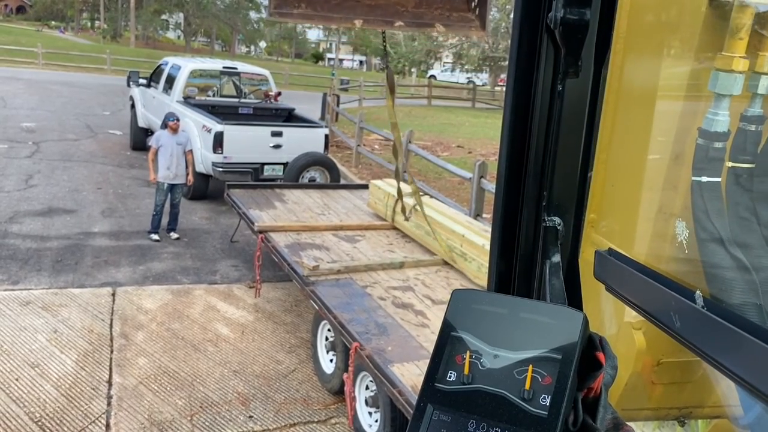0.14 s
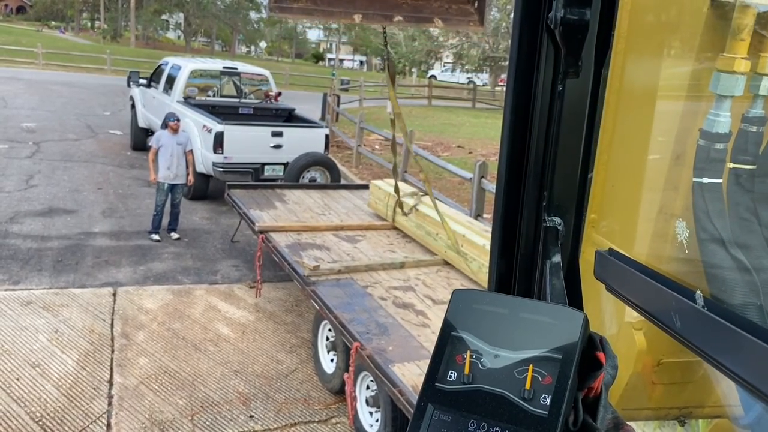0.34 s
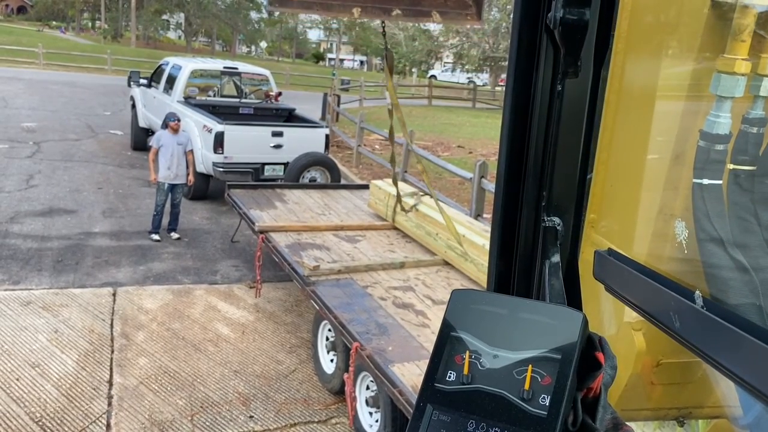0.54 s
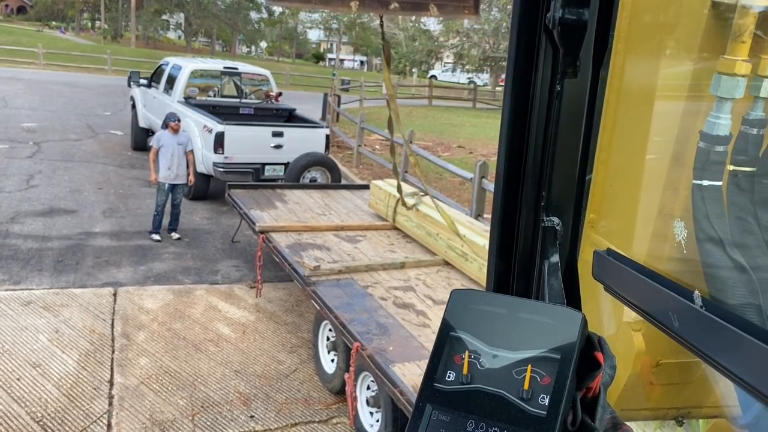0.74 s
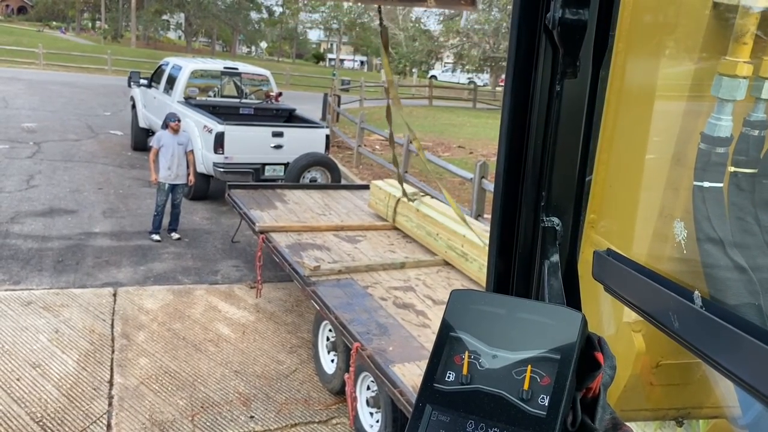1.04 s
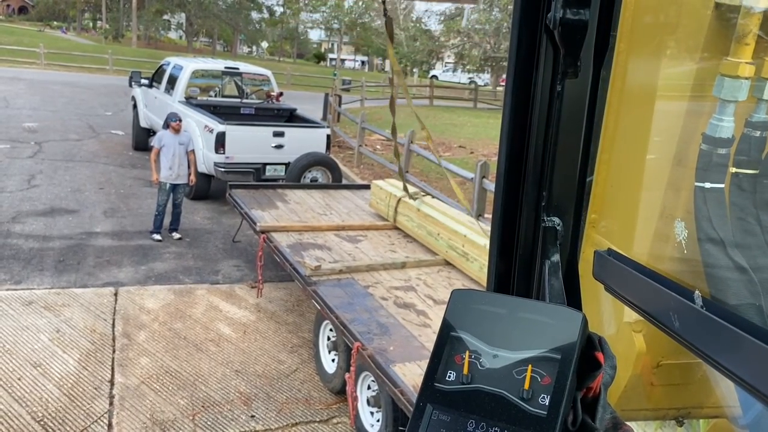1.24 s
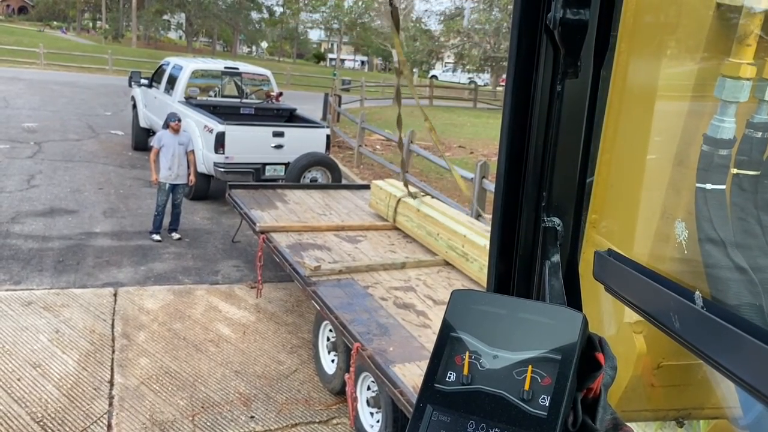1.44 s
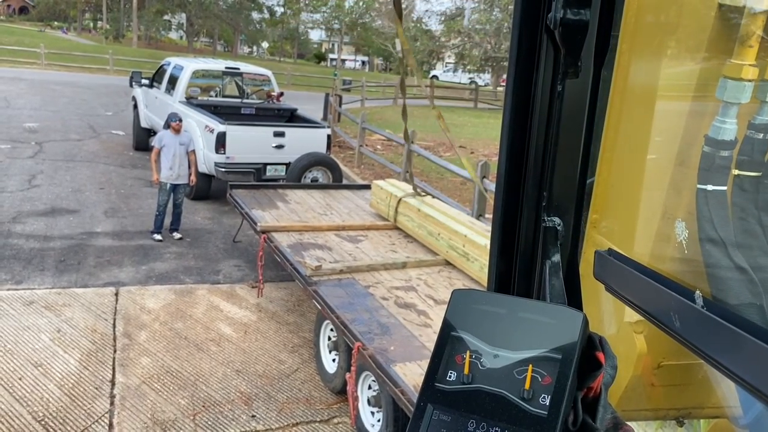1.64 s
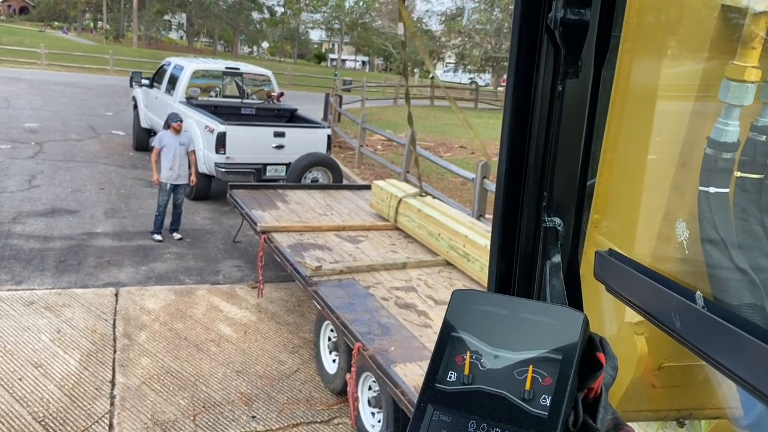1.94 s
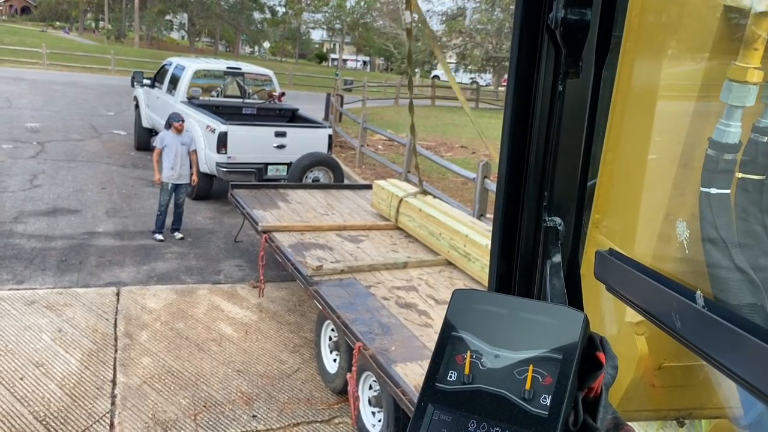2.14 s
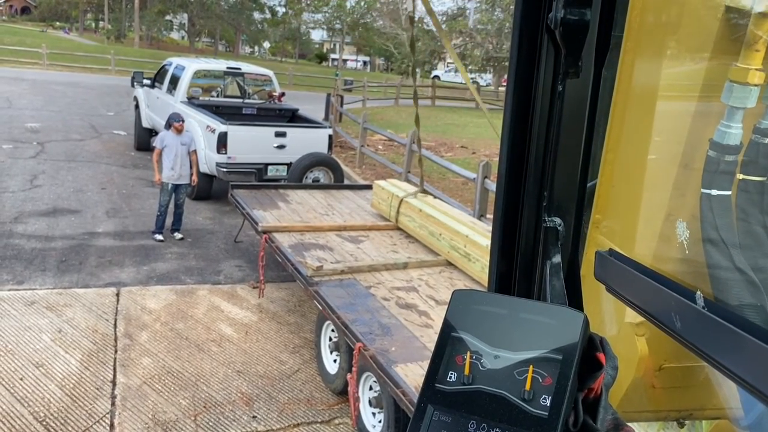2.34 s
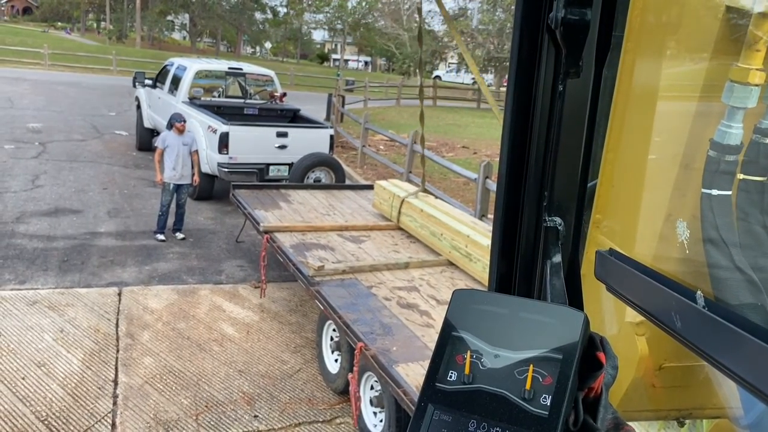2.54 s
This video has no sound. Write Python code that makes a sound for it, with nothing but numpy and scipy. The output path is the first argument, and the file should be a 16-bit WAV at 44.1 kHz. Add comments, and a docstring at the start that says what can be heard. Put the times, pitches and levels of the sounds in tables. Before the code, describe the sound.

A diesel excavator engine drones throughout at nearly constant revs, a deep, boomy tone filling the cab. Fan hum, a hydraulic pump whine that dips around 1.6 seconds and grows slightly after 2, dull rumble and soft hiss surround it. Faint, bright chain clinks come from outside near 0.7, 0.9, 1.4 and 1.8 seconds, clearest at 2.0, then several weak ones from 2.3 to 2.6.

```python
"""A deep four-cylinder boom fills the cab of a diesel excavator lifting a load at nearly steady revs.
Fan, piston pump and a geared accessory hum as harmonic series over rumble and hiss of filtered noise,
which cab panels and engine covers colour by resonance. Outside, the lifting chain clinks now and then:
crackling noise and ringing modes. A phone with two microphone ports hears it all."""
import sys
import numpy as np
from scipy import signal
from scipy.fft import rfft, irfft
from scipy.io import wavfile
from scipy.ndimage import uniform_filter1d

SR = 44100
rng = np.random.default_rng(int(sys.argv[2]) if len(sys.argv) > 2 else 0)


def store_pcm(level_fs):
    """Save levels as 16-bit WAV."""
    pcm = np.round(np.clip(level_fs, -1, 1) * 32767).astype(np.int16)
    wavfile.write(sys.argv[1], SR, np.atleast_2d(pcm).T)


N = 119070
T = np.arange(N) / SR  # s
HZ = np.maximum(np.fft.rfftfreq(N, 1 / SR), 1)


def undb(db):
    """Level law: an amplitude ratio is ten to the power of dB/20."""
    return 10 ** (np.asarray(db) / 20)


def read(table, count=1):
    """Spectral envelope: a column of a table, interpolated over log frequency."""
    table = np.array(table)
    return np.interp(np.log(HZ), np.log(table[:, 0]), table[:, count])


def walk(rate_hz):
    """Low-pass random modulation: a loop of 200 chance steps, smoothed twice, spread near 1."""
    step_samples = int(SR / rate_hz)
    held = rng.standard_normal(200)[np.arange(N) // step_samples % 200]
    return 1.27 * uniform_filter1d(uniform_filter1d(held, step_samples), step_samples)


def ringing(table):
    """Resonance: each mode lifts the gain around its own frequency."""
    return undb(sum(db * np.exp(-((HZ - hz) / width) ** 2 * 2) for hz, width, db in table))


LAG_S, LAG_FROM_HZ, IN_STEP_HZ = .00026, 6490, 10060  # the left port is late above LAG_FROM_HZ


def port_phase(hz):
    """Interaural-style delay: half the phase between ports (rad), constant below LAG_FROM_HZ."""
    return np.pi * LAG_S * (np.maximum(hz, LAG_FROM_HZ) - IN_STEP_HZ)


# Coherence of the noise at the two microphone ports
# (f/Hz, share of power common to both ports/0-1, left over right level/dB)
PORT_COHERENCE = [(60, 0.91, -0.2), (109, 0.93, -4), (196, 1, -4), (373, .5, 0), (700, 0.09, -1.5),
                  (1290, 0.12, -0.1), (2430, 0.05, .6), (4400, .3, 3), (7040, 0.62, 1.5), (15000, 1, -1.5)]


def at_ports(colour):
    """Partial coherence: spectra of common and unrelated noise at two ports, colour gain of rms 1."""
    common, left, right = rfft(rng.standard_normal((3, N)))
    share = np.clip(read(PORT_COHERENCE), 0, 1)
    shift = np.exp(-1j * port_phase(HZ))
    side = undb(read(PORT_COHERENCE, count=2) / 2)
    own = np.sqrt(1 - share)
    left_port = side * (np.sqrt(share) * common * shift + own * left)
    right_port = (np.sqrt(share) * common / shift + own * right) / side
    gain = undb(read(colour))
    return gain / np.sqrt(np.mean(gain ** 2)) * np.array([left_port, right_port])


WAVER_HZ = 5.66  # step rate of the level waver


def hum(turns, table):
    """Fourier series: wavering harmonics of a turning shaft, with level and phase offsets between ports."""
    out = 0
    ear = np.array([[.5], [-.5]])  # left, right
    for multiple, db, pan_db, lead, waver_db in table:
        phase = 2 * np.pi * (round(multiple) * turns + rng.random())
        level_db = db + waver_db * walk(WAVER_HZ) + pan_db * ear
        out = out + np.sqrt(2) * undb(level_db) * np.sin(phase + lead * ear)  # sqrt(2): levels are rms
    return out


# Engine speed, told by the second harmonic of the nine-piston pump, at 36 times the four-stroke cycle
# (t/s, f/Hz, gain on the pump hum/dB)
SHAFT_SPEED = [(.1, 471.6, 0.7), (.35, 470.6, 0), (.9, 471.6, -1), (1.2, 470.9, -1.5), (1.6, 470.2, -2.5),
               (1.8, 469.7, -1), (2.05, 470.3, 0.5), (2.25, 470.3, 1.5), (2.42, 472.6, 2), (2.6, 473.4, 2)]


def shaft():
    """Phase is the integral of frequency: engine cycles elapsed, and the pump gain along with them."""
    at, hz, pump_db = np.array(SHAFT_SPEED).T
    cycle = np.cumsum(np.interp(T, at, hz)) / 36 / SR
    return cycle, undb(np.interp(T, at, pump_db))


# Rumble and hiss as the cab colours them (f/Hz, relative level per Hz/dB)
CAB_COLOUR = [(20, -53), (45, -48), (62, -34), (72, -34.5), (81, -30.5), (87, -35), (97, -33), (107, -35.5),
              (114, -42.5), (125, -46.5), (150, -40), (168, -34.5), (190, -40.5), (210, -48), (230, -49.5),
              (300, -55.5), (340, -50.5), (450, -54.5), (550, -57), (690, -58.5), (750, -61.5),
              (1000, -63.5), (1380, -65), (1460, -69.5), (2000, -72), (3400, -76), (4000, -77),
              (6500, -83.5), (8000, -86), (10000, -90), (15000, -97)]
# Cab panels and engine covers that ring in the hiss (f/Hz, width/Hz, lift/dB)
PANEL_MODES = [(397, 20, -1), (823, 60, 4), (1008, 27, 4), (1240, 5.2, 2), (1335, 32, 5), (1556, 48, 4.5),
               (1730, 60, 3.5), (2760, 41, 6.5), (3020, 16, 6.5), (3087, 46, 5.5), (3186, 15, 9.5),
               (3430, 100, 3)]
# Slow drift of the noise (t/s, level of all bands from 256 Hz up/dB, added level from 8.2 kHz up/dB)
HISS_DRIFT = [(0, 0.3, 1), (.6, -0.6, -1), (1.2, 0, 0.1), (1.8, -0.3, 1), (2.25, -0.1, 0.5),
              (2.4, 0.1, 1.5), (2.55, 0.5, -1), (2.7, 2.3, -2)]
CAB_DB, FLICKER_DB, FLICKER_HZ = -25, 0.97, 12.02
KNOCK = .06  # depth of the pulse, which comes twice per firing


def rumble(cycle):
    """Amplitude-modulated noise: half-octave bands flicker alone; upper ones pulse with valves and injectors."""
    noise = at_ports(CAB_COLOUR) * ringing(PANEL_MODES)
    at, hiss_db, treble_db = np.array(HISS_DRIFT).T
    pulse = np.cos(2 * np.pi * 8 * cycle)  # four firings per cycle
    out = 0
    for step in np.arange(8, 29):  # band centre is 2 ** (step / 2) Hz
        band = np.clip(1 - abs(2 * np.log2(HZ) - step), 0, 1)
        knock = 1 + KNOCK * (step > 18) * pulse
        drift_db = np.interp(T, at, hiss_db * (step > 15) + treble_db * (step > 25))
        flicker_db = FLICKER_DB * (step > 14) * walk(FLICKER_HZ)
        out = out + irfft(noise * band, N) * undb(drift_db + flicker_db) * knock
    return undb(CAB_DB) * out


# Blows between chain links (t/s, crackle level at onset/dB, crackle decay t60/s, hold before decay/s)
CLINK_EVENTS = [(0.6628, -59, .1, .004), (0.8744, -62, .1, .004), (1.3926, -54, .09, .012),
                (1.7683, -59, .1, .006), (1.946, -56, .05, .003), (1.9953, -43.5, .13, .012),
                (2.323, -61, .1, .01), (2.4894, -63, .1, .004), (2.558, -56.5, .15, .012),
                (2.5844, -60, .12, .004)]
# Colour of the crackle (f/Hz, relative level per Hz/dB)
CRACKLE_COLOUR = [(2500, -24), (4000, -13), (7000, -8), (10300, 0), (12500, -6), (14000, -6), (16000, -11)]
# Modes of the chain links (f/Hz before chance detuning, relative level/dB, decay t60/s)
LINK_MODES = [(4060, -6, .15), (5050, -5, .16), (5500, -5, .18), (6360, -10, .15), (6840, -6, .13),
              (7590, -2, .12), (8080, -9, .11), (8860, 0, .11), (9650, -2, .11), (10340, 0, .1),
              (10900, -3, .09), (13270, -8, .09), (14250, -6, .1)]
RING_DB, DETUNE = -4, .003  # ring against crackle; spread of tuning as a share
BUILD_CYCLES, BUILD_REF_HZ = 30., 6490  # a mode at the reference swells over this many cycles
ROUGH_DB, ROUGH_HZ = 2.5, 1500.  # grit of the crackle


def chain():
    """Impact excitation: a gritty crackle that holds briefly, and link modes whose low ones swell late."""
    crackle, ring = 0, np.zeros((2, N + SR))
    t = T[:SR // 4]
    hz, mode_db, t60 = np.array(LINK_MODES).T[:, :, None]
    chance = rng.standard_normal((len(CLINK_EVENTS), 3, len(LINK_MODES), 1))
    build_s = BUILD_CYCLES * BUILD_REF_HZ / hz ** 2
    for (start, db, crackle_t60, hold), (tune, turn, size) in zip(CLINK_EVENTS, chance):
        fall_db = 60 * np.clip(T - start - hold, 0, 2) / crackle_t60
        crackle = crackle + (T >= start) * undb(db - fall_db)
        ring_db = db + RING_DB + mode_db + 2 * size - 60 * np.maximum(t - hold, 0) / t60
        swell = (1 - np.exp(-t / build_s)) * undb(ring_db)
        phase = 2 * np.pi * (hz * (1 + DETUNE * tune) * t + turn)
        for port, sign in enumerate((-1, 1)):
            modes = swell * np.sin(phase + sign * port_phase(hz))
            ring[port, round(start * SR):][:len(t)] += np.sum(modes, axis=0)
    grit = undb(ROUGH_DB * walk(ROUGH_HZ))
    return crackle * grit * irfft(at_ports(CRACKLE_COLOUR), N) + ring[:, :N]


# Geared accessory (multiple of its rate, level/dB, left over right/dB, left leads/rad, waver/dB)
GEAR_HARMONICS = [(3, -49, -1.4, .02, 1.), (4, -57, -10, -.55, 1.), (5, -55, -5, -.1, 1.),
                  (6, -50, -5.3, .73, 1.), (7, -63, -12, 1.4, 1.)]


def gear():
    """Periodic excitation: harmonics of an accessory turning at a fixed rate."""
    return hum(115.46 * T, GEAR_HARMONICS)  # Hz


# Piston pump (multiple of engine cycle, level before pump gain/dB, left over right/dB, left leads/rad, waver/dB)
PUMP_HARMONICS = [(18, -39.3, -5.7, -1.5, .9), (36, -36, 3.4, .55, .9), (90, -59, 1.5, -1.6, 1.2),
                  (144, -61, .3, -.95, 1.2), (162, -66, -.9, -1.1, 2.1), (166, -69, 2.1, -.3, 1.5)]


def pump(cycle, gain):
    """Flow ripple: orders of the nine-piston pump, locked to the engine, rise and fall together."""
    return gain * hum(cycle, PUMP_HARMONICS)


# Fan (multiple of blade rate, level/dB, left over right/dB, left leads/rad, waver/dB)
FAN_HARMONICS = [(1, -19, -5.8, -.37, .7), (2, -51, -12, -.85, 1.5), (3, -50, -2.9, 1.36, 1.5),
                 (4, -60, -15, -.6, 1.5)]
BLADES_PER_CYCLE, FAN_WANDER, FAN_WANDER_HZ = 12.945, 0.0012, 2.91  # mean rate, share, step rate


def fan(cycle):
    """Blade-passing tone: harmonics of a blade rate that follows the engine and wanders slightly."""
    wander = 1 + FAN_WANDER * walk(FAN_WANDER_HZ)
    blades = BLADES_PER_CYCLE * np.cumsum(np.gradient(cycle) * wander)
    return hum(blades, FAN_HARMONICS)


# Four-cylinder engine (multiple of four-stroke cycle, level/dB, left over right/dB, left leads/rad, waver/dB)
ENGINE_ORDERS = [(2, -46.5, -1.6, -.06, 1.), (5, -45, -2, 0, 1.5), (7, -45, -1, -.27, 1.5),
                 (4, -14, -1.7, -.06, .25), (8, -35, -4, -.3, 1.5), (12, -34.5, -7, .03, 1.),
                 (14, -35.5, -6, .3, 1.), (17, -52, -3.7, -.4, 1.5), (19, -55, -2.5, -.1, 1.5),
                 (24, -56, -1.3, .9, 1.5), (40, -56, -.9, .4, 1.5), (48, -62, -5, .5, 1.5),
                 (52, -59, -9, .2, 1.5), (54, -55, -.6, 1.6, 1.5)]


def engine(cycle):
    """Engine orders: the firing tone, four per cycle, booms above the weaker orders."""
    return hum(cycle, ENGINE_ORDERS)


def scene():
    """Superposition: the pressures of all sources add at each port."""
    cycle, pump_gain = shaft()
    background = rumble(cycle) + chain()
    return background + gear() + pump(cycle, pump_gain) + fan(cycle) + engine(cycle)


def record(dry):
    """Band limiting: the phone opens within 2 ms and a steep low-pass cuts the top."""
    opening = np.minimum(T / .002, 1)
    low_pass = signal.ellip(10, .2, 80, 15795, fs=SR, output="sos")  # order, ripple dB, stop dB, Hz
    return signal.sosfilt(low_pass, dry * opening)


dry = scene()
out = record(dry)
store_pcm(out)
```